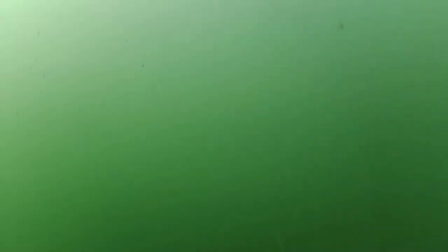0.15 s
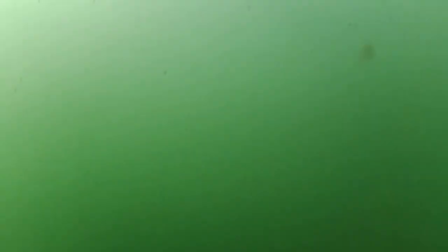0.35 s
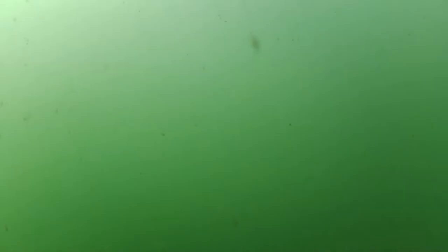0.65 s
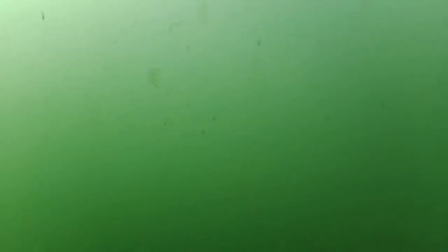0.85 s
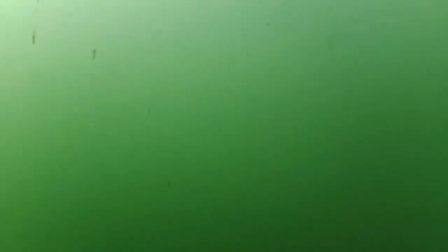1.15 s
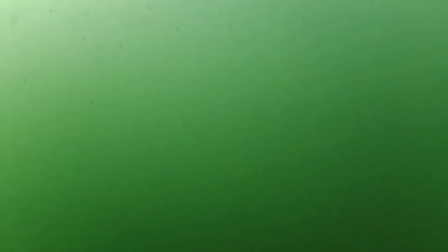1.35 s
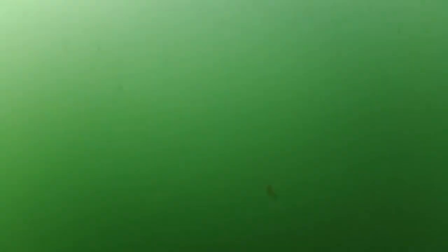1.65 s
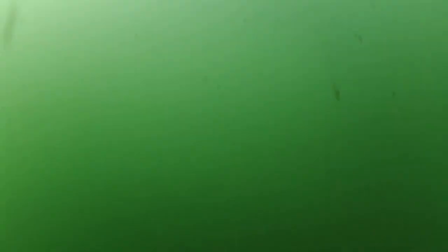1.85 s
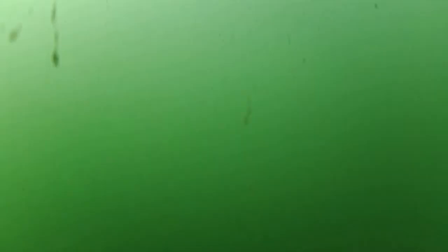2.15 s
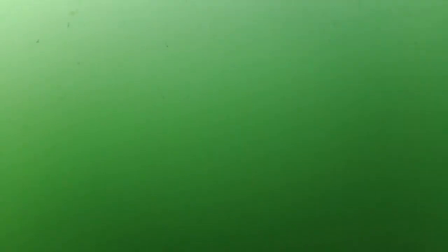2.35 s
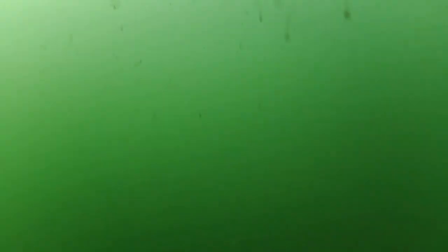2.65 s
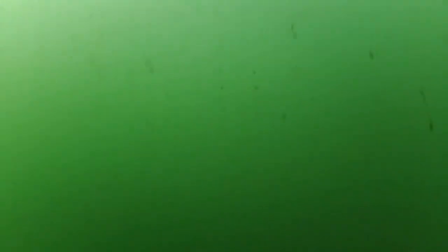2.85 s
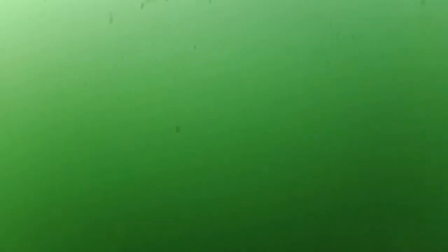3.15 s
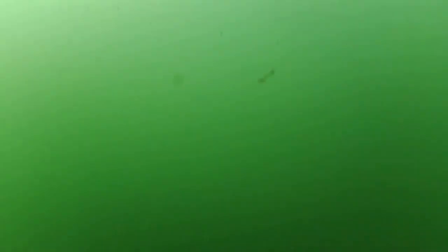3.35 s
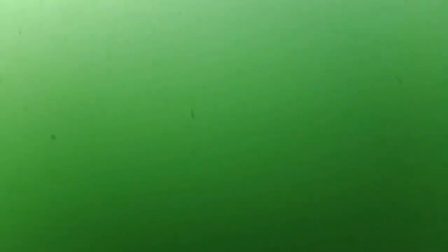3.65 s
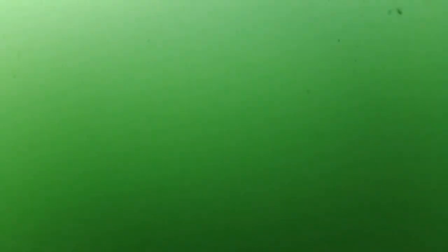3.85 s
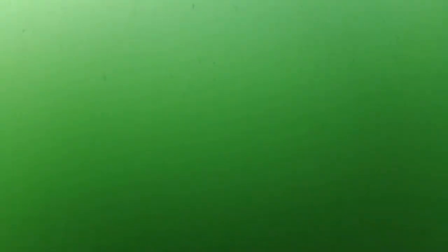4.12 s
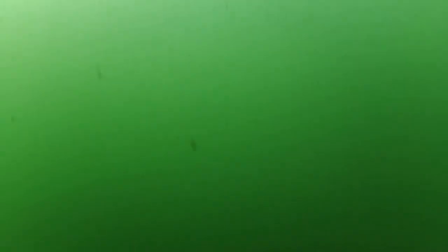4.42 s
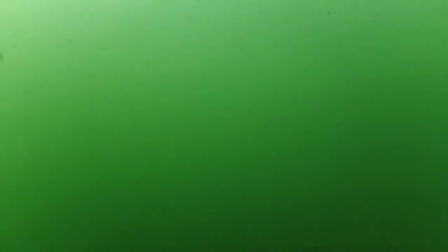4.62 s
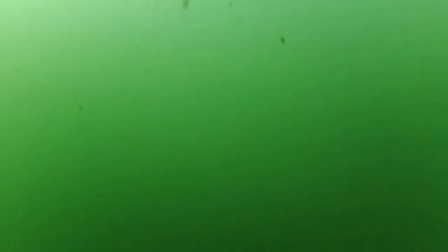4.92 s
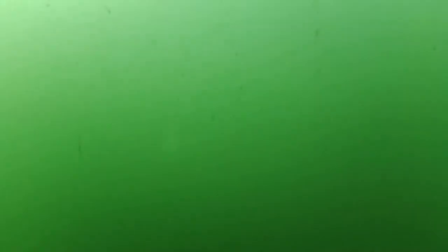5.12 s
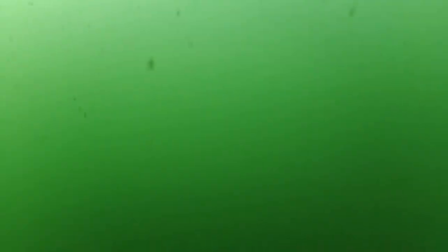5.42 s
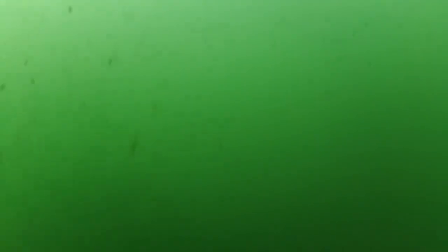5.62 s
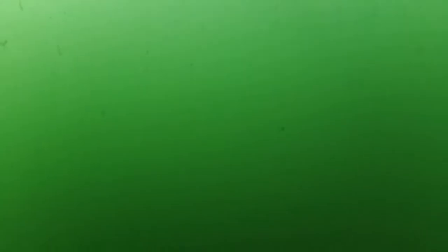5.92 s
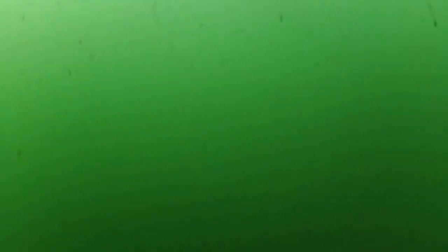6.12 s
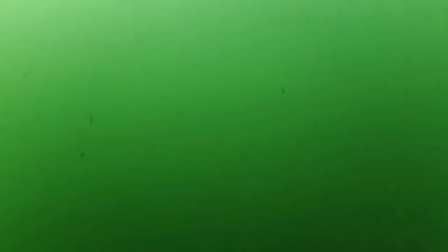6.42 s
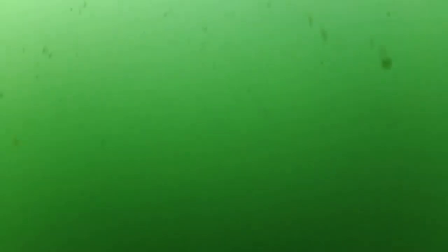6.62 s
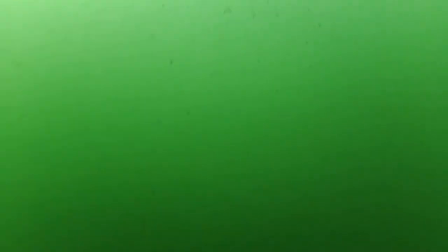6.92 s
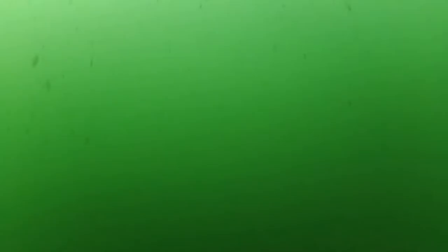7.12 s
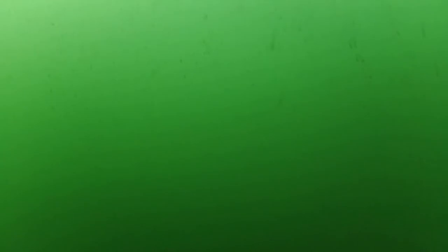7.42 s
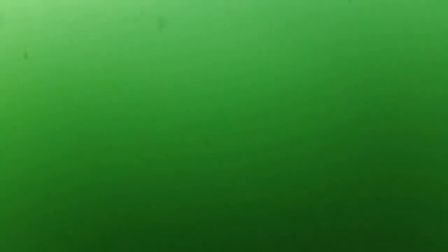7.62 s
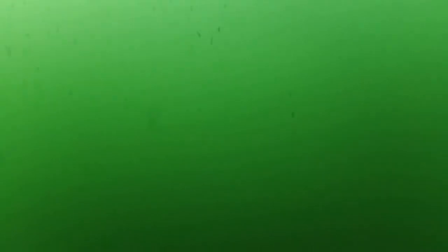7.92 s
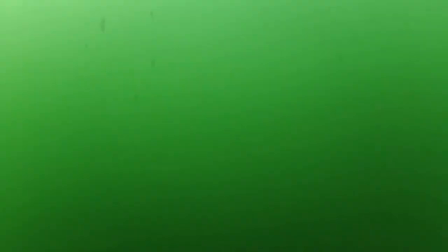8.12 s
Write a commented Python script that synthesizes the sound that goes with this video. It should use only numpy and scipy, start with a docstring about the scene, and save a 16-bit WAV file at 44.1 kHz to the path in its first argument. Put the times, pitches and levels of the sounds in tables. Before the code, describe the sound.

A muffled, close underwater sound from a microphone in a hard case. Engine and water flow hum softly under a gliding whine and rare taps. Then hollow irregular blows chatter rapidly into a loud rough drone, with bubbly pings and snaps. A quieter gap with scattered knocks and a short whine follows, then the shaking returns.

```python
"""Irregular blows ring a camera's sealed housing, towed under water behind a motor boat, as a rough drone.
Small blows chatter in spells with one long pause; single hard blows excite its modes as impulses.
Bubbles gush past as clouds of rising pings. Engine and flow keep the housing humming, as filtered noise.
A thin wavering whine, likely a taut line, sings twice as gliding sines; a few faint ticks ring nearby."""
import sys
import numpy as np
from scipy import signal
from scipy.fft import rfft, irfft, next_fast_len
from scipy.io import wavfile
from scipy.ndimage import uniform_filter1d, minimum_filter1d, map_coordinates

SR = 44100
rng = np.random.default_rng(int(sys.argv[2]) if len(sys.argv) > 2 else 0)


def persist_wave(psi):
    """Save psi, clipped to +-1, as 16-bit WAV."""
    counts = np.round(np.clip(psi, -1, 1) * 32767).astype(np.int16)
    wavfile.write(sys.argv[1], SR, np.atleast_2d(counts).T)


N = 364521


def amp(db):
    """Level to amplitude: 20 dB is a factor of ten."""
    return 10 ** (np.asarray(db) / 20)


def unit(x):
    """Normalization by power: scale to rms 1."""
    return x / np.sqrt(np.mean(x ** 2) + 1e-20)


def along(points, hz):
    """Interpolation of (Hz, value) points on a logarithmic frequency axis."""
    f, v = np.transpose(points)
    return np.interp(np.log(hz + 1), np.log(f), v)


def curves(rows):
    """Linear interpolation in time: one value per sample for each column after the first."""
    s, *cols = np.transpose(rows)
    return [np.interp(np.arange(N) / SR, s, c) for c in cols]


def wobble(rate):
    """Slow random modulation: a smooth curve through rate normal random knots a second."""
    knots = rng.standard_normal(int(N * rate / SR) + 4)
    return map_coordinates(knots, [np.arange(N) * rate / SR])


def filtered(x, gain):
    """Linear filtering: multiply the spectrum by a gain that depends on frequency."""
    m = next_fast_len(N + SR // 2)
    return irfft(rfft(x, m) * gain(np.fft.rfftfreq(m, 1 / SR)), m)[:N]


def above(hz, edge_hz, order=8):
    """High-pass gain with a soft edge, where it is one half."""
    r = (hz / edge_hz) ** order
    return r / (1 + r)


def ring(gain, size=16384):
    """Minimum-phase response: fold the cepstrum of a gain curve into a causal impulse response, peak 1."""
    cepstrum = irfft(np.log(np.maximum(gain(np.fft.rfftfreq(size, 1 / SR)), 1e-5)))
    cepstrum[1:size // 2] *= 2
    cepstrum[size // 2 + 1:] = 0
    h = irfft(np.exp(rfft(cepstrum)))
    return h / np.abs(h).max()


def patter(rate, spread_db):
    """Random impulses at a mean rate per second, of either sign and widely different sizes."""
    when, size = rng.random(N), rng.standard_normal(N)
    sizes = amp(spread_db * np.clip(size, -2, 2))
    return (when < rate / SR) * rng.choice([-1, 1], N) * sizes


def evened(x, seconds):
    """Division by the running rms: slow chance swells go, fast ones stay."""
    power = np.abs(uniform_filter1d(x ** 2, int(seconds * SR) + 1))
    return x / np.sqrt(power + 1e-3 * np.mean(x ** 2))


# Modes of the housing. Each row: centre in Hz, width in Hz, height in dB (negative for a hollow).
HOUSING_MODES = [(83.4, 5.5, 5), (154.17, 5.7, 30.5), (218, 37, -9), (338.1, 22, 20.5), (532.2, 34, -17),
                 (576.7, 26.6, 18), (642, 52.5, 17), (986.6, 60, 7), (1333, 23, 8), (1960, 37, 7),
                 (2340, 37, 9.5), (2438, 250, -13.5), (3865, 91, 12.5), (4620, 300, 8.5)]


def housing(hz, drive):
    """Modal resonance: the driving spectrum is raised at each mode and lowered at each hollow."""
    modes_db = 0
    for centre, width, db in HOUSING_MODES:
        bell = 1 + (amp(abs(db)) ** 2 - 1) / (1 + (2 * (hz - centre) / width) ** 2)
        modes_db = modes_db + np.sign(db) * 10 * np.log10(bell)
    return amp(along(drive, hz) + modes_db)


# Spectrum of the flow that drives the housing. Each row: frequency in Hz, relative level in dB.
FLOW_SPECTRUM = [(25, -25), (70, -4), (130, -12.5), (300, -14), (700, -9.5), (1000, 0.5), (1250, -16),
                 (1800, -15), (2600, -15), (4000, -45), (5500, -50), (9000, -61.5)]
# Spectrum of the steady hiss. Each row: frequency in Hz, relative level in dB.
HISS_SPECTRUM = [(2500, -30.5), (3250, 1.5), (3750, 0), (4150, -11), (4650, 0), (5200, -8.5), (7800, -11.5),
                 (15500, -16.5)]
# Lower part of the hiss. Each row: time in seconds, relative level in dB.
LOW_HISS_LEVEL = [(2, 4), (2.8, -4)]
# The hum before its random swells. Each row: time in seconds, level in dB.
HUM_LEVEL = [(0, -37), (.8, -39.5), (2.1, -37.5), (2.6, -41), (4.8, -41), (5.5, -35.5), (6.3, -38.5)]


def hum():
    """Forced vibration: engine and flow noise excites the modes; the bass swells more than the wash above."""
    body = unit(filtered(rng.standard_normal(N), lambda hz: housing(hz, FLOW_SPECTRUM)))
    bass = filtered(body, lambda hz: 1 - above(hz, 460))
    swelling = bass * amp(2.4 * wobble(19)) + (body - bass) * amp(wobble(18))
    hiss = unit(filtered(rng.standard_normal(N), lambda hz: amp(along(HISS_SPECTRUM, hz))))
    top = filtered(hiss, lambda hz: above(hz, 5500))
    hiss = top + (hiss - top) * amp(curves(LOW_HISS_LEVEL)[0] + wobble(22))
    return amp(curves(HUM_LEVEL)[0]) * swelling + amp(-72.5) * hiss


# Sharp little ticks. Each row: time in seconds, level in dB before colouring, ring in Hz.
TICKS_HEARD = [(1.454, -52, 7570), (2.604, -42.5, 6600), (5.56, -44, 9500), (5.575, -43, 8100),
               (6.863, -44.5, 6350)]


def ticks():
    """Impact and damped oscillation: specks strike the housing, each a short noise crack with one high ring."""
    out, t = np.zeros(N), np.arange(SR // 20) / SR
    for s, db, hz in TICKS_HEARD:
        crack = .4 * amp(-60 * t / .007) * rng.standard_normal(len(t))
        ping = 0.52 * amp(-60 * t / 0.0073) * np.sin(2 * np.pi * hz * t)
        out[int(s * SR):][:len(t)] += amp(db) * (crack + ping)
    colour = [(1500, -31.5), (3600, 20.0), (8000, 2.0), (15000, -13.5)]  # Hz, dB
    return filtered(out, lambda hz: amp(along(colour, hz)))


# Two glides of the whine, one list each. Each row: time in seconds, pitch in Hz before sway and jitter.
LINE_GLIDES = [
    [(0, 1077), (.12, 1006), (.2, 890), (.25, 735), (.36, 720), (.42, 630), (.6, 601), (.72, 827),
     (.89, 652), (1.02, 997), (1.48, 1003), (1.61, 1141), (1.75, 886), (1.88, 993), (2.0, 895), (2.06, 950),
     (2.22, 604)],
    [(5.47, 861), (5.53, 1051), (5.66, 974.4), (5.7, 873), (5.735, 980), (5.8, 859), (5.84, 672),
     (5.94, 560), (6.1, 590)],
]
# Colour of the whine. Each row: frequency in Hz, gain in dB.
WHINE_COLOUR = [(600, -4.5), (990, 1.5), (1150, -1), (1970, -1), (2400, -5)]
# one value per glide: level before colouring, and the octave relative to the tone
LINE_DB, OCTAVE_DB = [-44.5, -42], [-8.5, -14]
SING_FADE_S = .08  # fade in before and out after each glide
SWAY, SWAY_HZ, JITTER = .038, 13, .009  # shares of the pitch in the first strand; the second has double


def flutter():
    """Random amplitude modulation, slow and fast at once."""
    return amp(3.5 * wobble(35)) * (1 + .45 * wobble(260))


def line():
    """Vortex shedding: eddies sing a tone and its octave, in two strands, one rougher, that sway apart."""
    out, t = np.zeros(N), np.arange(N) / SR
    for glide, db, octave_db in zip(LINE_GLIDES, LINE_DB, OCTAVE_DB):
        inside = np.minimum(t - glide[0][0], glide[-1][0] - t)
        singing = np.clip(1 + inside / SING_FADE_S, 0, 1)
        for strand in (1, 2):
            sway = strand * SWAY * np.sin(2 * np.pi * SWAY_HZ * t + strand * wobble(6))
            pitch = curves(glide)[0] * (1 + sway + strand * JITTER * wobble(400))
            phase = 2 * np.pi * np.cumsum(pitch) / SR
            tone = np.sin(phase) + amp(octave_db) * np.sin(2 * phase)
            out += amp(db) / np.sqrt(strand) * singing * flutter() * tone
    return filtered(out, lambda hz: amp(along(WHINE_COLOUR, hz)))


# Gushes of bubbles. Each row: start in seconds, length in seconds, rms level in dB over that length.
BUBBLE_GUSHES = [(2.526, 0.023, -38.5), (2.819, 0.02, -38.5), (2.861, .025, -32.5), (2.998, 0.027, -36.5),
                 (3.46, .02, -35), (4.375, .04, -40), (4.749, 0.021, -42)]
BUBBLE_LOW_HZ, BUBBLE_HIGH_HZ, BUBBLE_T60_S = 1230, 2196, 0.01
BUBBLE_RISE_PER_S = 8.4  # growth of the pitch, as a share of its start


def gushes(count=16):
    """Bubble resonance: each gush is a cloud of tiny bubbles, each a short damped ping of rising pitch."""
    out, t = np.zeros(N), np.arange(SR // 50) / SR
    for s, length, db in BUBBLE_GUSHES:
        cloud = np.zeros(N)
        for when, size in rng.random((count, 2)):
            hz = BUBBLE_LOW_HZ + size * (BUBBLE_HIGH_HZ - BUBBLE_LOW_HZ)
            tone = np.sin(2 * np.pi * hz * t * (1 + BUBBLE_RISE_PER_S * t / 2))
            ping = tone * amp(-60 * t / BUBBLE_T60_S) * (1 - np.exp(-t * hz))
            cloud[int((s + when * length) * SR):][:len(t)] += ping
        out += amp(db) * cloud / np.sqrt(np.sum(cloud ** 2) / (length * SR))
    return out


# Spells of shaking. Each row: start, full height and end of the hold in seconds,
# then the relative levels of heave, rattle and crackle in dB.
SHAKING_SPELLS = [(2.247, 2.5, 2.65, -22, -25.5, -44.5), (2.713, 2.8, 4.42, -19, -23, -42.5),
                  (4.655, 4.7, 5.137, -24, -22, -43.5), (6.389, 6.597, 7.404, -22.5, -23, -45.5),
                  (7.472, 7.5, 8.47, -18.5, -28, -50.5)]
ONSET_S, BUILD_DB_PER_S, RELEASE_DB_PER_S = 0.0067, 10, 99  # the shape of every spell


def spells():
    """Envelope of heave, rattle and crackle: abrupt onset, build to full height, hold and decay."""
    t, gains = np.arange(N) / SR, 0
    for start, height, end, *levels_db in SHAKING_SPELLS:
        early, over = np.maximum([height - t, t - end], 0)
        onset = np.clip((t - start) / ONSET_S, 0, 1)
        shape = onset * amp(-BUILD_DB_PER_S * early - RELEASE_DB_PER_S * over)
        gains = gains + np.outer(amp(levels_db), shape)
    return gains


HUSH_DB, HUSH_S = 9, .011  # the small blows ease off before a hard one
BEATS_PER_S, BEAT_FALL_DB = 31, 5  # approximate rate of the chatter, and the fall within each beat


def bunching():
    """Rhythmic modulation: each uneven beat is one sharp blow and a fading patter, hushed before a hard blow."""
    t, times = np.arange(N) / SR, np.array([row[0] for row in HARD_BLOWS])
    marks = np.append(times, N / SR)
    # a whole number of beats fits between two hard blows
    beats_between = np.maximum(1, np.round(np.diff(marks, prepend=0) * BEATS_PER_S))
    beat = np.interp(t, marks, np.cumsum(beats_between))
    beat = beat + np.sin(np.pi * beat / 2) ** 2 * 0.3 * wobble(23)
    until_next = marks[np.searchsorted(marks, t)] - t
    hush = amp(-HUSH_DB * np.exp(-until_next / HUSH_S))
    new_beat = np.diff(np.floor(beat), append=0) > 0
    leading = new_beat * (until_next > HUSH_S) * amp(2 * rng.standard_normal(N))
    running = uniform_filter1d(hush * amp(-BEAT_FALL_DB * (beat % 1)), size=64)
    return unit(leading), unit(running)


# The strongest blows. Each row: time in seconds, then rap, knock and thump in dB before the trims below.
HARD_BLOWS = [(0.046, -38, -25, -29), (0.363, -12.5, -12, -18.5), (1.463, -16, -24.5, -29),
              (2.271, -15.5, -31, -25), (2.356, -26, -41.5, -14.5), (2.412, -17.5, -22, -15.5),
              (2.493, -23, -19, -13.5), (2.543, -11.5, -12, -15), (2.623, -13.5, -19.5, -24),
              (2.712, -34, -20.5, -9.5), (2.764, -25.5, -13, -24), (2.836, -11, -29.5, -26),
              (2.864, -13, -28, -17), (2.981, -11.5, -20.5, -16), (3.036, -9.5, -20, -19),
              (3.094, -12, -17.5, -15), (3.142, -14, -13, -25), (3.207, -17.5, -12.5, -18.5),
              (3.323, -33, -23, -10), (3.41, -11.5, -26, -9.5), (3.434, -9, -28, -20.5),
              (3.473, -15.5, -13, -21), (3.538, -8, -15, -10), (3.603, -19.5, -19, -12),
              (3.648, -11.5, -20.5, -15), (3.692, -14, -12.5, -12), (3.768, -14.5, -17.5, -21),
              (3.915, -20, -26, -14), (4.009, -13.5, -21, -9), (4.141, -13.5, -12.5, -11),
              (4.201, -30, -21.5, -15.5), (4.251, -20.5, -15, -5), (4.345, -15, -12, -19),
              (4.431, -18, -27, -14), (4.494, -16.5, -29, -11.5), (4.549, -14, -15, -9.5),
              (4.613, -21.5, -23.5, -9.5), (4.671, -15, -14, -32), (4.714, -8.5, -21, -37),
              (4.755, -7, -23, -12.5), (4.806, -27, -16, -5.5), (4.916, -20, -35, -11),
              (5.068, -13.5, -15.5, -11.5), (5.144, -12.5, -24.5, -17), (5.186, -16, -18, -18),
              (5.281, -18, -28.5, -23), (5.334, -14, -21, -15.5), (5.762, -19, -24, -29.5),
              (5.852, -16.5, -27, -27), (5.876, -18.5, -23, -17), (5.944, -14, -19, -22.5),
              (5.991, -13.5, -19, -25), (6.1, -18, -22, -25.5), (6.226, -16.5, -25.5, -28.5),
              (6.248, -15, -18, -14), (6.334, -11.5, -17, -10), (6.42, -13, -23.5, -29),
              (6.625, -17.5, -23, -13), (6.664, -16.5, -25, -13.5), (6.728, -15, -29.5, -29),
              (6.798, -10.5, -19, -10.5), (6.838, -14.5, -22, -12.5), (6.879, -14.5, -20, -9),
              (6.994, -14.5, -19.5, -13.5), (7.05, -13, -19, -14.5), (7.08, -19.5, -18.5, -19),
              (7.151, -13, -23, -17), (7.189, -12, -17, -12), (7.22, -11.5, -17.5, -10),
              (7.249, -9.5, -14.5, -12), (7.278, -14.5, -21, -8.5), (7.324, -11, -23.5, -16.5),
              (7.364, -21, -21, -5.5), (7.411, -10.5, -17, -9.5), (7.46, -10, -15.5, -17.5),
              (7.6, -12.5, -24.5, -11), (7.633, -16.5, -17, -19.5), (7.682, -17, -23, -9),
              (7.714, -17, -17, -11.5), (7.815, -13.5, -18, -9), (7.986, -16.5, -25, -18),
              (8.068, -16.5, -14, -31), (8.123, -17, -17, -13), (8.155, -16, -28, -24)]
RAP_DB, KNOCK_DB, THUMP_DB = -3, 1, 3.5  # trims: how strongly the blows excite each part of the housing


def hard_blows():
    """Impulsive excitation: each blow strikes walls, shell and whole body, and the walls twice."""
    raps, knocks, thumps = np.zeros((3, N))
    bounces = rng.uniform(0.004, 0.011, len(HARD_BLOWS))  # seconds
    for (s, rap_db, knock_db, thump_db), bounce in zip(HARD_BLOWS, bounces):
        raps[int(s * SR)] += amp(rap_db + RAP_DB)
        raps[int((s + bounce) * SR)] += amp(rap_db + RAP_DB - 4)  # a weaker second contact
        knocks[int(s * SR)] = amp(knock_db + KNOCK_DB)
        thumps[int(s * SR)] = amp(thump_db + THUMP_DB)
    return raps, knocks, thumps


# Spectrum of a blow on the housing. Each row: frequency in Hz, relative level in dB.
BLOW_SPECTRUM = [(25, -14.5), (50, -10.5), (130, 2), (300, -3.5), (700, -11.5), (1000, -5.5), (1250, -20.5),
                 (1800, -17), (2600, -42.5), (4000, -62.5)]
# Spectrum of a dry crack. Each row: frequency in Hz, relative level in dB.
CRACK_SPECTRUM = [(700, -22), (1150, -3.5), (1750, 0.5), (2400, -4.5), (2600, -13), (3300, -25),
                  (4000, -33.5), (9000, -58)]
# Sharp snaps, likely bubbles collapsing on the housing. Each row: time in seconds, peak in dB.
SINGLE_SNAPS = [(2.769, -25), (2.955, -24), (3.398, -26.5), (3.848, -27), (3.879, -22), (4.507, -25.5),
                (4.615, -28), (5.039, -28), (6.451, -25), (6.482, -31), (6.879, -29.5), (7.713, -30)]
# Deep bass of the shaking. Each row: time in seconds, gain in dB.
DEEP_LEVEL = [(5, -1), (6.6, -5.5)]
SURGE_DB, SURGES_PER_S = 1.3, 14  # chance swells of the heave
CRACK_DB, RUMBLE_DB = -16.5, -14.5  # a hard blow's crack over its rap, and its rumble over its thump
THUMP_DAMP_DB_PER_S = 60  # a hard thump dies faster than the soft heave
BEAT_DB, FIZZ_DB = -7.5, 0  # gains of the leading blows in the patter and of the fizz in the crackle
FLURRY_DB, FLURRY_S = -19, .012  # small blows around each hard one: gain on its rap, and fade time


def mode(low_hz, high_hz):
    """Band-limited modal response: the housing's ring between two soft edges."""
    return ring(lambda hz: housing(hz, BLOW_SPECTRUM) * above(hz, low_hz) * (1 - above(hz, high_hz)))


def sound(pushes, response):
    """Convolution: every push rings out with the impulse response."""
    return signal.fftconvolve(pushes, response)[:N]


def shaking():
    """Superposed impulse responses: small and hard blows ring as low thump, hollow knock, rap and dry crack."""
    heave = ring(lambda hz: housing(hz, BLOW_SPECTRUM) * (1 - above(hz, 211.5)))
    damping = amp(-THUMP_DAMP_DB_PER_S * np.arange(len(heave)) / SR)
    thump = heave * damping + amp(RUMBLE_DB) * mode(27, 110)
    shell, walls, both = mode(252, 480), mode(514, 1400), mode(254.0, 1250)
    crack = ring(lambda hz: housing(hz, CRACK_SPECTRUM))
    heaving, rattling, crackling = spells()
    leading, running = bunching()

    small = evened(patter(rate=520, spread_db=5.5), 0.04)
    heaved = sound(small + 0.62 * rng.standard_normal(N), heave)
    low = running * heaving * evened(heaved, 0.074)
    low = low * amp(SURGE_DB * wobble(SURGES_PER_S))
    low = filtered(low, lambda hz: 1 - above(hz, 220))  # the whole housing is too heavy to move fast

    pushes = unit(running * unit(small * amp(2.2 * wobble(60))) + amp(BEAT_DB) * leading)
    fizz = amp(FIZZ_DB) * running * rng.standard_normal(N)
    cracks = crackling * unit((pushes + fizz) * amp(4.4 * wobble(50))) / np.linalg.norm(crack)
    for s, db in SINGLE_SNAPS:
        cracks[int(s * SR)] += amp(db)

    raps, knocks, thumps = hard_blows()
    hard = sound(raps, walls) + sound(knocks, shell) + sound(thumps, thump)
    offset = np.arange(-SR // 20, SR // 20) / SR
    around = signal.fftconvolve(raps, np.exp(-np.abs(offset) / FLURRY_S), "same")
    flurry = amp(FLURRY_DB) * around * unit(small)
    rattle = sound(rattling * pushes + flurry, both) / np.linalg.norm(both)

    body = low + rattle + hard
    deep = filtered(body, lambda hz: 1 - above(hz, 115))
    body = body + (amp(curves(DEEP_LEVEL)[0]) - 1) * deep
    return body + sound(cracks + amp(CRACK_DB) * raps, crack)


def scene():
    """Linear superposition: all sources add at one microphone in the housing."""
    return (hum() + ticks() + line() + gushes() + shaking())[None]


TOP_HZ = 15760  # nothing is kept from here up


def record(dry):
    """Peak limiting and band limiting: the camera holds down the highest peaks and keeps little deep rumble."""
    x = filtered(dry[0], lambda hz: above(hz, 20, order=4))
    needed = np.minimum(1, .75 / (np.abs(x) + 1e-9))
    gain = uniform_filter1d(minimum_filter1d(needed, size=601), size=601)
    return filtered(x * gain, lambda hz: hz < TOP_HZ)[None]


dry = scene()
out = record(dry)
persist_wave(out)
```